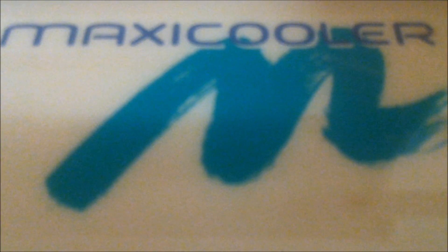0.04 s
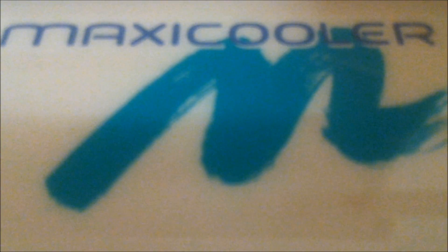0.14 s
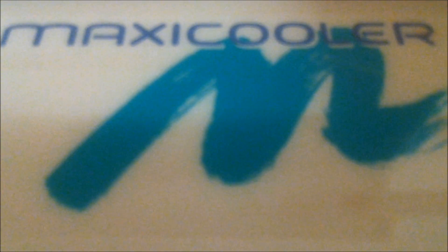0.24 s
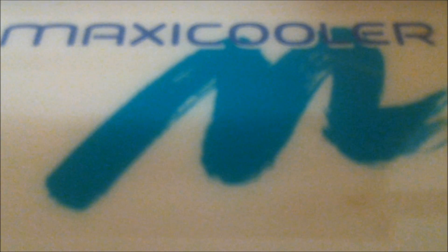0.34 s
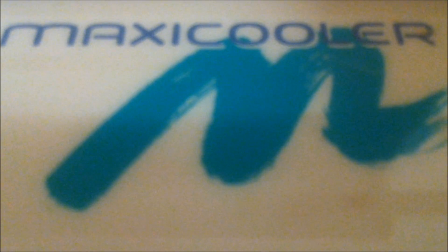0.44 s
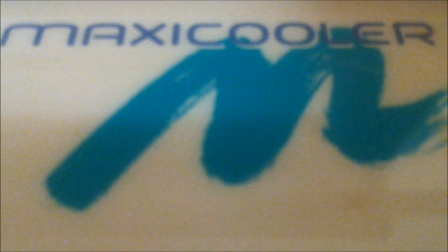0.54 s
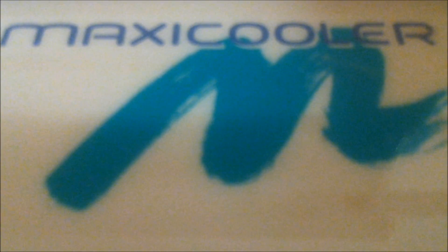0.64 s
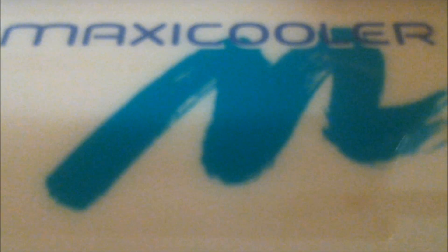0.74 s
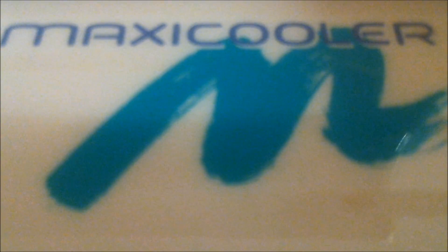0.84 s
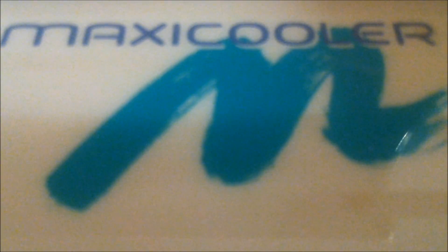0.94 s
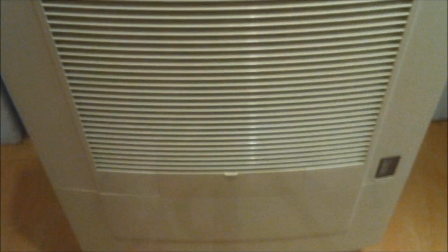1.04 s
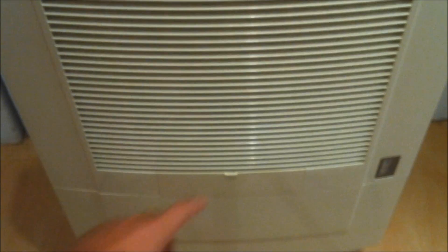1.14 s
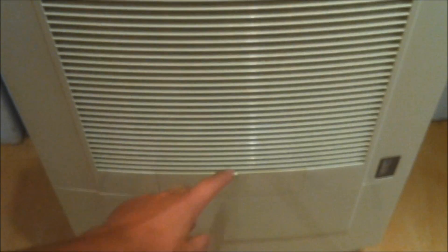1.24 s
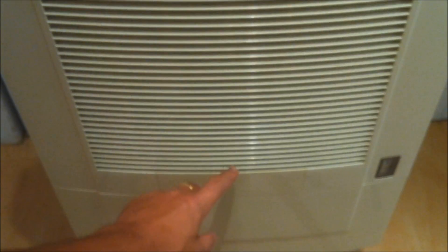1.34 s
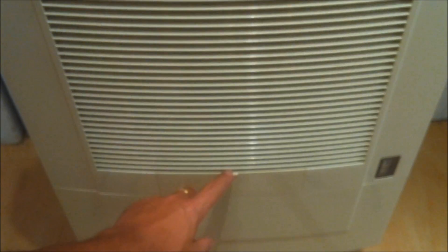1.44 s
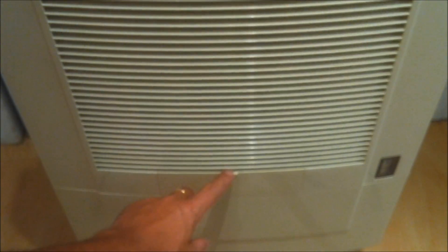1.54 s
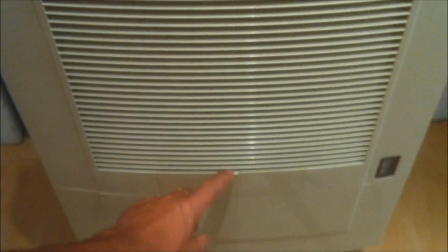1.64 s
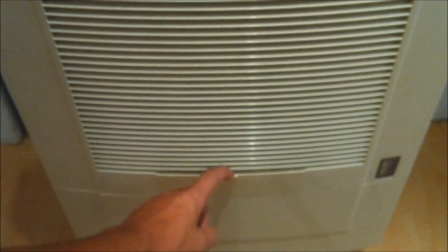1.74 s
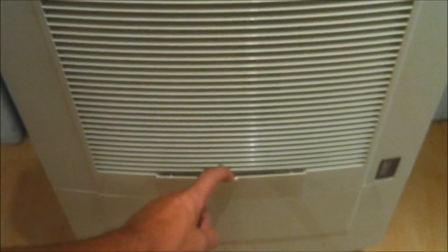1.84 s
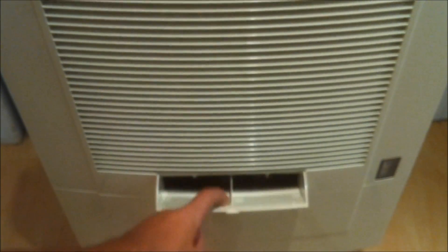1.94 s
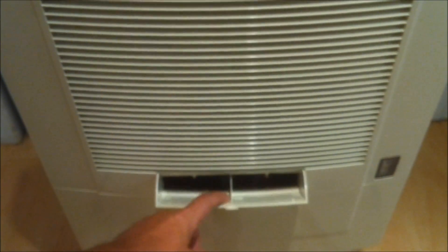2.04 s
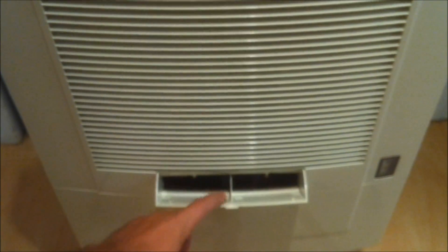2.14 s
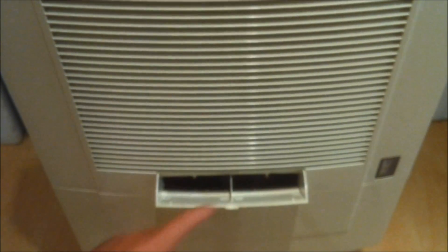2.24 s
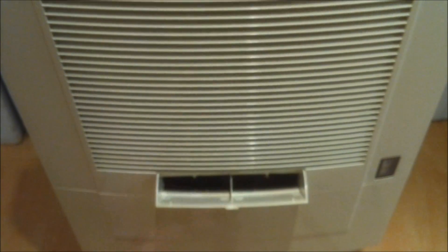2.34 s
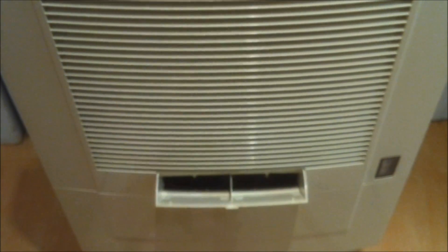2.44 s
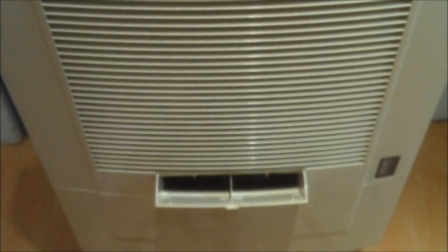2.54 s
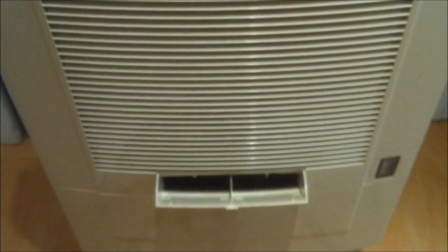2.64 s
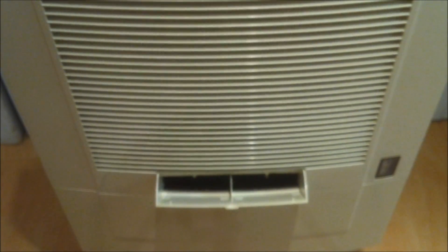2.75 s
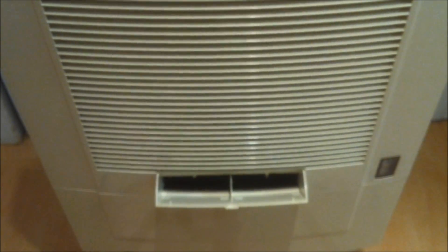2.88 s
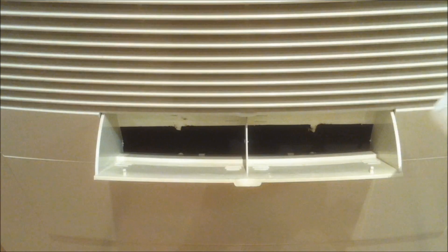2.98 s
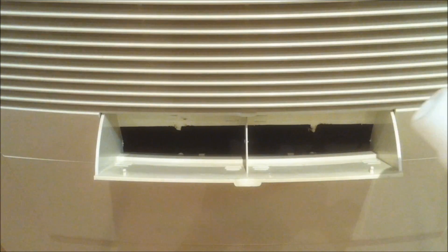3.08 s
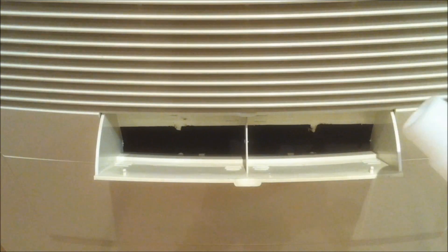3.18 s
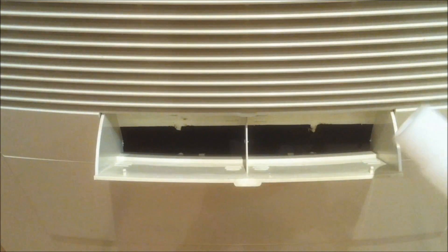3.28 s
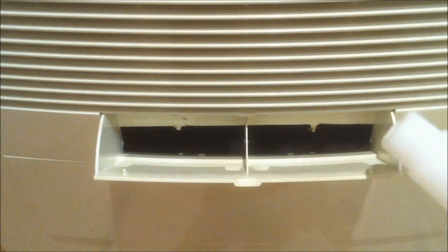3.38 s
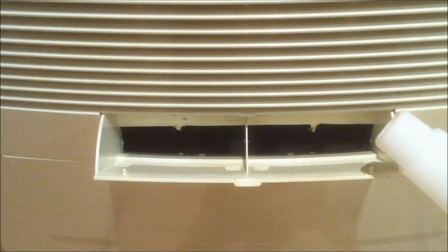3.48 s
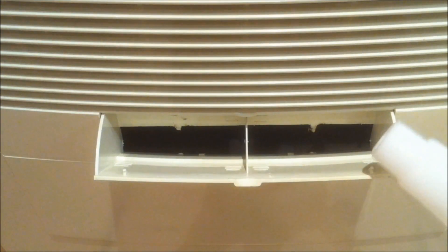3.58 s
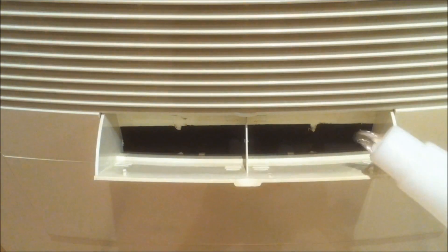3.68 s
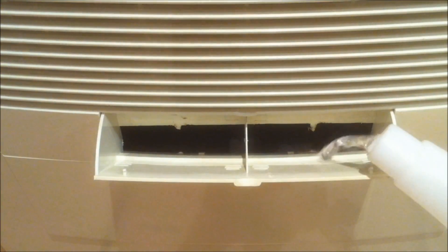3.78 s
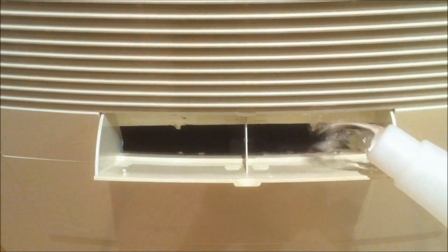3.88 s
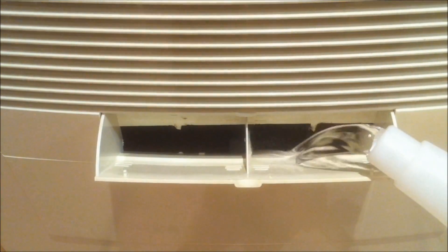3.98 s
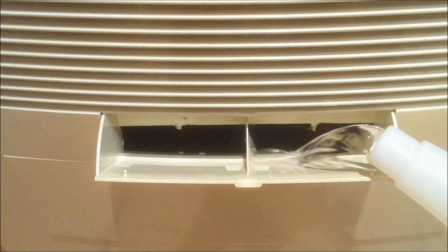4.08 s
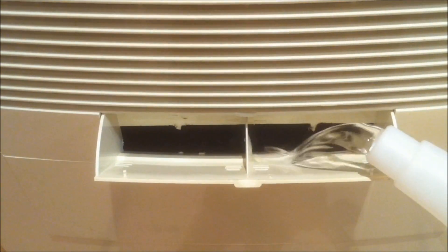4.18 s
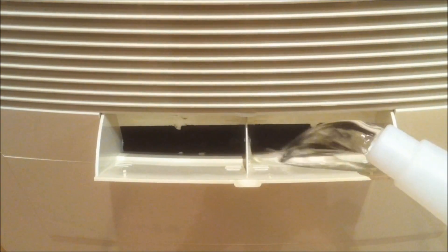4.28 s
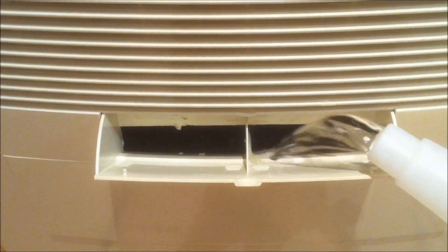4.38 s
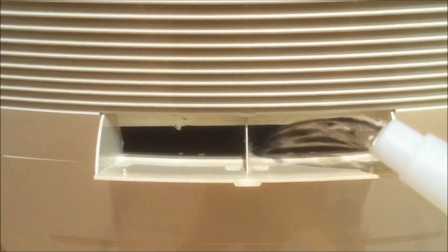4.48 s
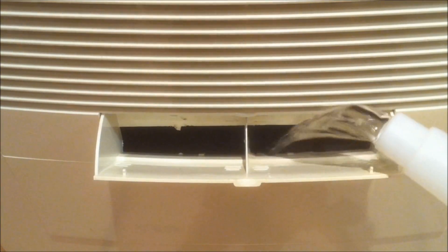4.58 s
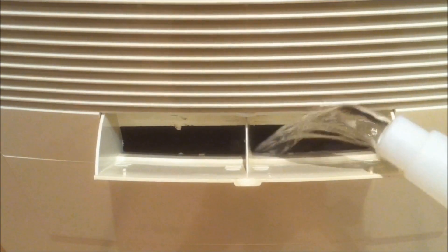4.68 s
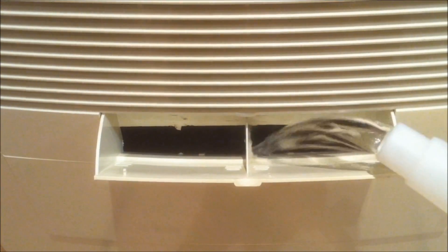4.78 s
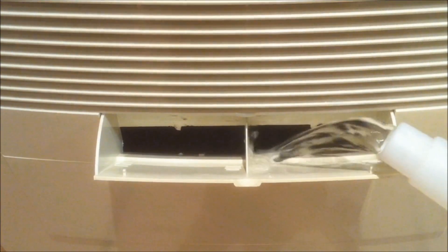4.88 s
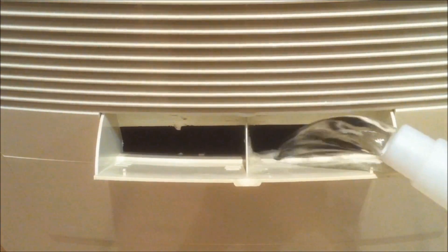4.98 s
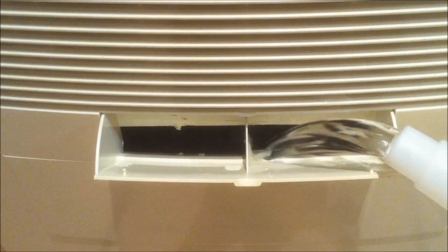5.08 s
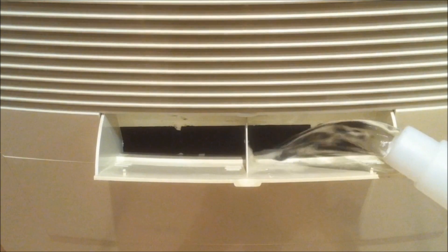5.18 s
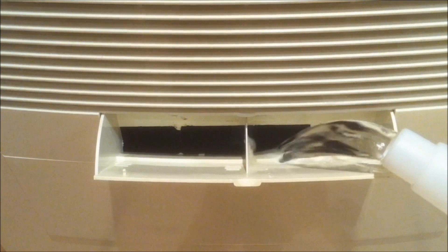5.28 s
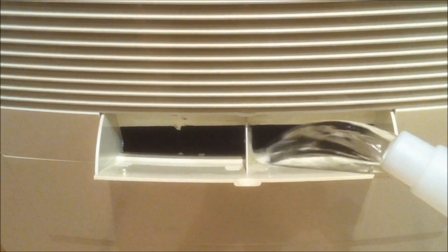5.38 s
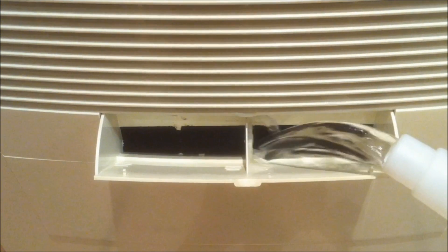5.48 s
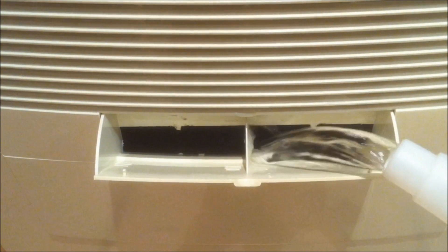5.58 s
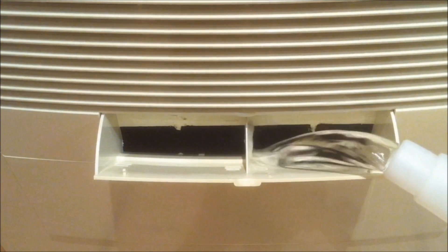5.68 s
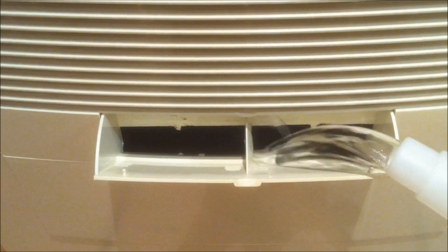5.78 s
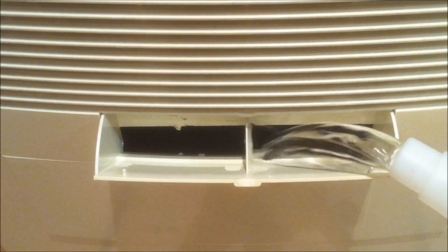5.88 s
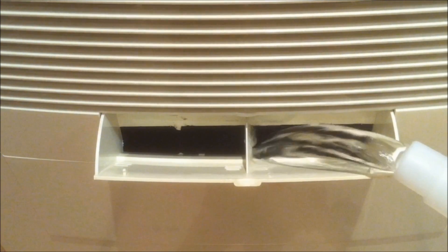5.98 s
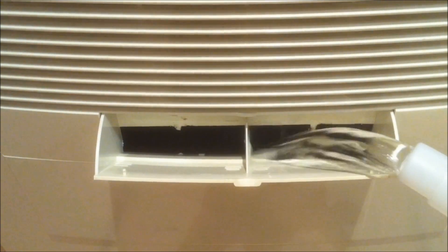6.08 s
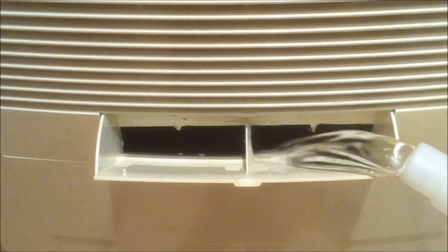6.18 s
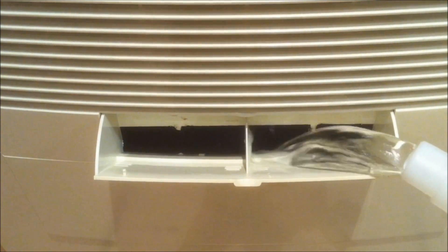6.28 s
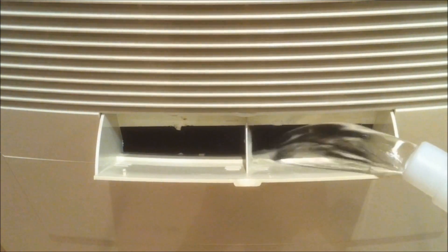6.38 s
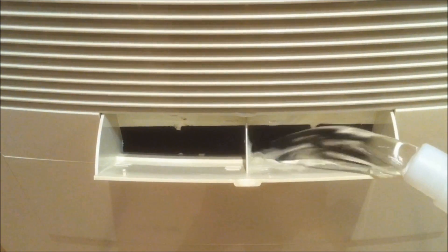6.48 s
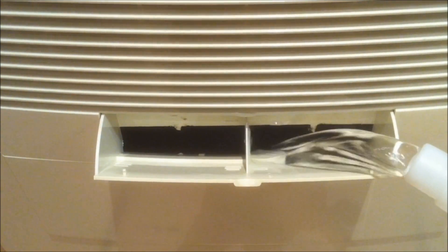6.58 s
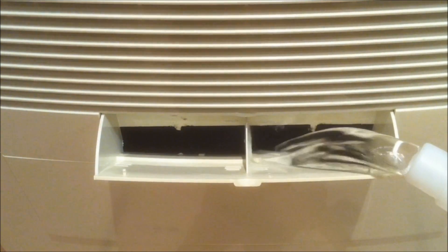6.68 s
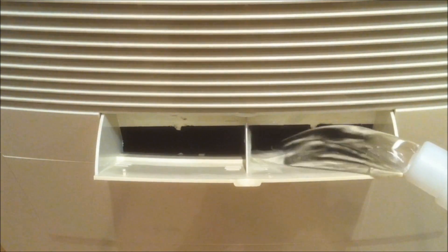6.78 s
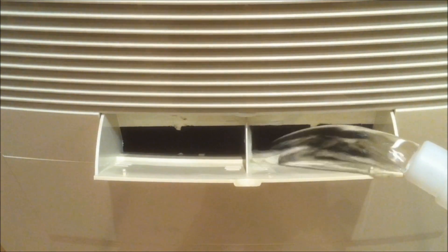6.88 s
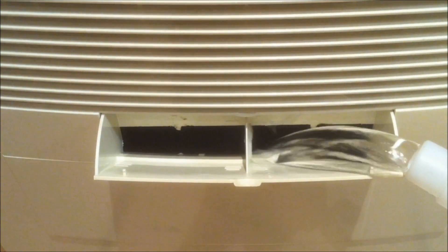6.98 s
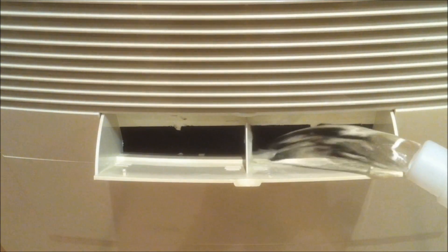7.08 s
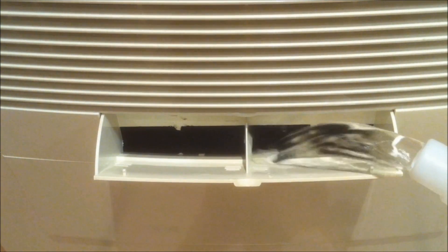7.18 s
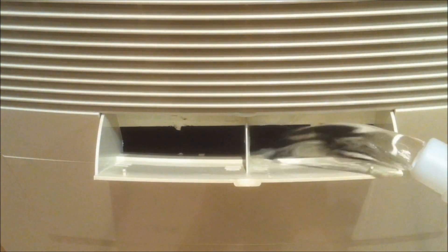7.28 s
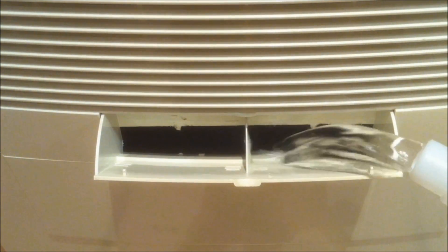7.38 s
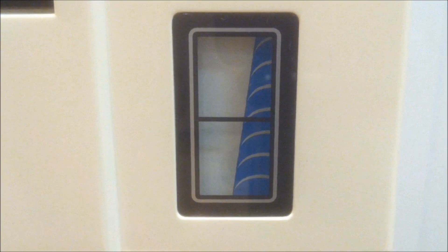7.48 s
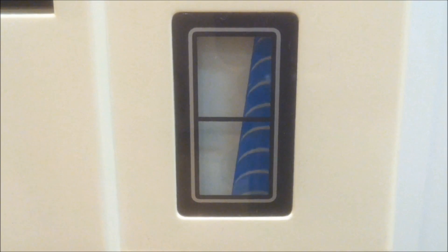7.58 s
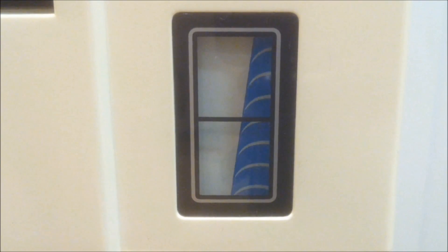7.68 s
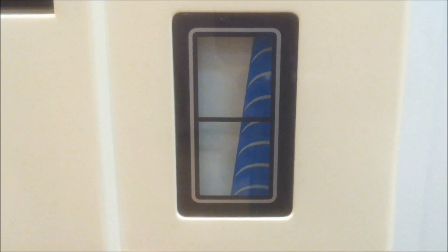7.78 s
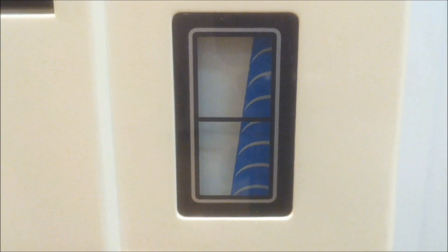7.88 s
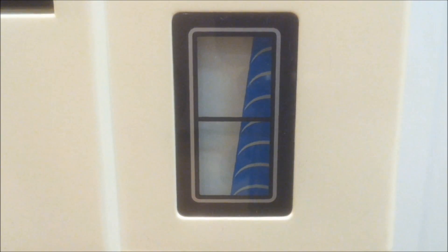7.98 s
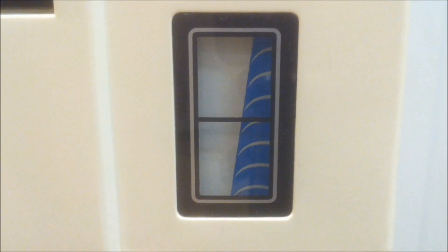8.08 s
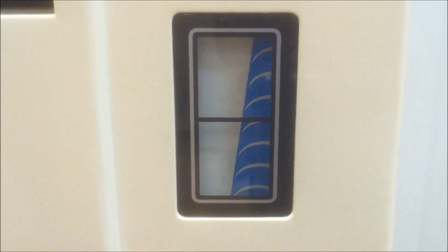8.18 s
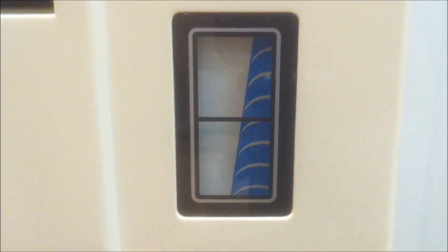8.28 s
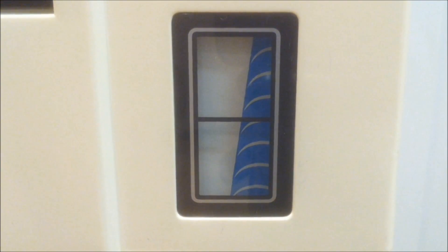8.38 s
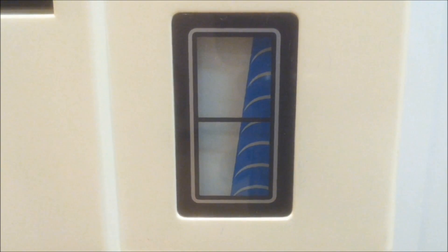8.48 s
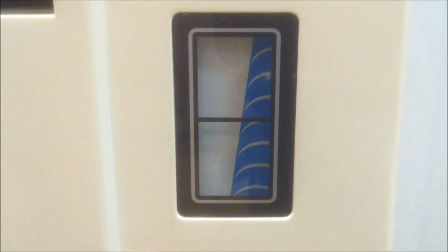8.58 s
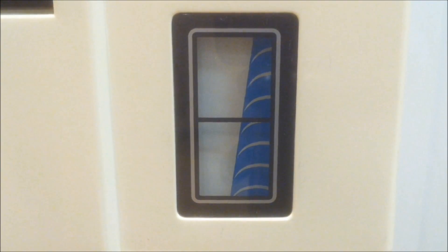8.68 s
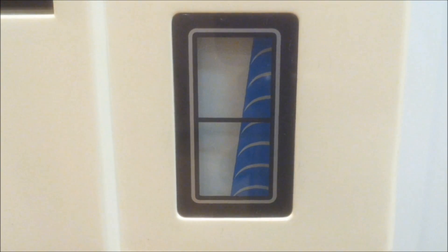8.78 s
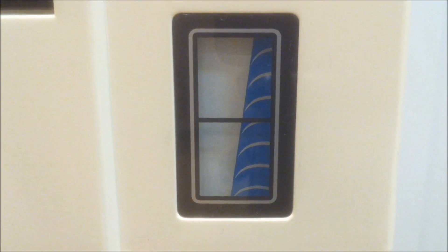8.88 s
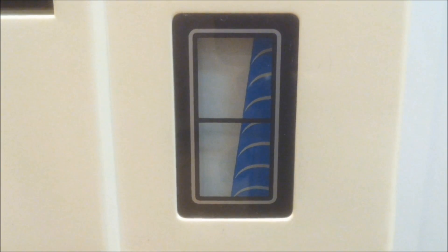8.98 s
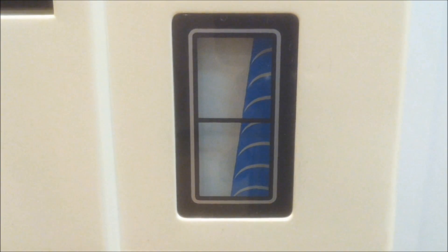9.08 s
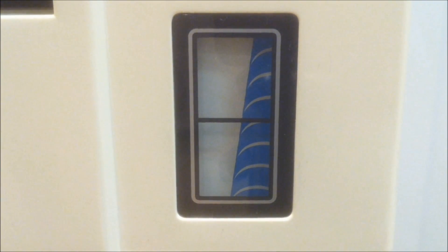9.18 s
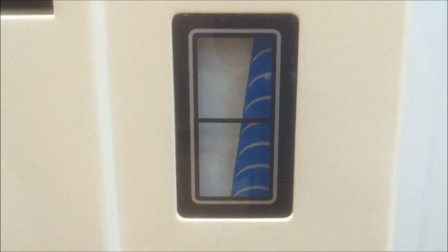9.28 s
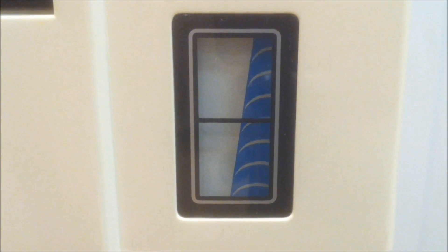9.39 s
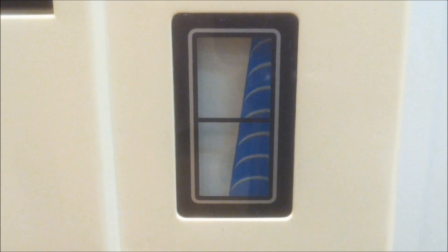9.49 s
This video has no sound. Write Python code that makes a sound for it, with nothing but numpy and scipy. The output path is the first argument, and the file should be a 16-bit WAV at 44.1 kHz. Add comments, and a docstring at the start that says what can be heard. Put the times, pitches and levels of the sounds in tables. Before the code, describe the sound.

A quiet room with faint hum. A hand brushes lightly over plastic, then a flap drags and slams open with a hard rattling knock and a low casing boom. A dull bump of a jug follows, first drops, then a strong splashing, gurgling stream into a hollow tank with thuds. Abruptly the pouring sounds much softer and duller, from the side. One microphone, short room echo.

```python
"""A stream of water splashes through a filler flap into the hollow tank of a portable air cooler:
shaped noise makes the spray, ringing bubbles the gurgle, a humming resonance the tank wall.
Before it, a finger pulls the plastic flap open, it slams on its stop, a jug bumps the lip and drops fall.
Knocks ring as dying tones with bursts of noise. The last part is heard from the side, duller and softer.
A quiet room adds echoes, soft noise and hum. One microphone."""
import sys
import numpy as np
from scipy import signal
from scipy.fft import rfft, irfft, next_fast_len
from scipy.io import wavfile

SR = 44100
rng = np.random.default_rng(int(sys.argv[2]) if len(sys.argv) > 2 else 0)


def log_audio(samples):
    """Write samples as a 16-bit WAV file to the path given in sys.argv[1]."""
    # one column per channel
    frames = np.atleast_2d(samples).T
    # limit to full scale, then quantise
    limited = np.clip(frames, -1, 1)
    pcm = np.round(limited * 32767).astype(np.int16)
    wavfile.write(sys.argv[1], SR, pcm)


N = 420713   # length in samples

# All levels are those before the room and record() act.
# "t60" is the time a sound takes to fall by 60 dB.


def from_db(db):
    """Turn decibels into a plain multiplier."""
    return 10 ** (np.asarray(db) / 20)


def rms_one(x):
    """Scale a sound to an average strength (rms) of 1."""
    return x / np.sqrt(np.mean(x ** 2) + 1e-20)


def gains_in_time(rows):
    """Draw each dB column as one gain per sample, silent outside the table."""
    times, *columns = np.transpose(rows)
    t = np.arange(N) / SR
    return [from_db(np.interp(t, times, column, left=-200, right=-200)) for column in columns]


def at_hz(points, hz):
    """Read a table between its points, with pitch on a logarithmic scale."""
    table_hz, values = np.transpose(points)
    return np.interp(np.log(hz), np.log(table_hz), values)


def colour(x, spectrum):
    """Make some pitches louder than others, following a table; the result has rms 1."""
    size = next_fast_len(N)
    hz = np.arange(size // 2 + 1) * SR / size + 1   # the 1 avoids log(0)
    shaped = rfft(x, size) * from_db(at_hz(spectrum, hz))
    return rms_one(irfft(shaped, size)[:N])


def band(x, low_hz, high_hz):
    """Keep only the pitches between two limits (Butterworth band-pass)."""
    limits = [low_hz, min(high_hz, 0.45 * SR)]
    return signal.sosfilt(signal.butter(2, limits, "band", fs=SR, output="sos"), x)


def ring(clicks, hz, t60):
    """Let each click set off a dying sine, like a tapped object; a click of 1 gives height 1."""
    shrink = from_db(-60 / (t60 * SR))
    turn = 2 * np.pi * hz / SR
    feedback = [1, -2 * shrink * np.cos(turn), shrink * shrink]
    return signal.lfilter([0, np.sin(turn)], feedback, clicks + 1e-18)


def fade(clicks, t60):
    """Make an envelope that jumps at each click and dies away."""
    return signal.lfilter([1], [1, -from_db(-60 / (t60 * SR))], clicks + 1e-18)


def swell(clicks, t60):
    """Fade with a rounded start, as a slap of water takes some milliseconds to spread; rms 1."""
    return rms_one(fade(fade(clicks, t60), 0.24 * t60))


def dying(t, t60):
    """Exponential decay from 1."""
    return from_db(-60 * t / t60)


def chance_clicks(per_s, spread_db):
    """Place clicks at random moments, many small and few large."""
    happens = rng.random(N) < per_s / SR
    return happens * from_db(spread_db * np.minimum(rng.exponential(1, N), 4))


def strike(times, levels_db, modes, damping, soft_hz):
    """Each blow rings every tone of a body with a random strength; a soft contact dulls the sound."""
    at, out = (np.array(times) * SR).astype(int), np.zeros(N)
    for hz, level_db, t60 in modes:
        clicks = np.zeros(N)
        clicks[at] = from_db(levels_db + level_db + rng.normal(0, 2.6, len(at)))
        out += ring(clicks, hz, t60 * damping)
    return signal.sosfilt(signal.butter(2, soft_hz, fs=SR, output="sos"), out)


# loudness of the stream near the flap: (time [s], spray level [dB], bubbling level [dB])
NEAR_LEVELS = [(4.33, -46, -56), (4.38, -46, -60), (4.51, -41.5, -51), (4.67, -39, -48.5), (4.73, -42, -53),
               (4.9, -40, -51.5), (5.05, -46, -52), (5.16, -41.5, -60), (5.28, -44.5, -65),
               (5.38, -38.5, -57), (5.6, -43, -50.5), (5.87, -39.5, -50.5), (6.05, -42, -49),
               (6.29, -38, -45.5), (6.4, -41, -49.5), (6.8, -39.5, -44), (7.01, -40.5, -47),
               (7.4, -39, -43), (7.54, -40, -47)]
# tone of its spray: (frequency [Hz], relative level per Hz [dB])
NEAR_COLOUR = [(180, -39), (300, -11.5), (787, -7.5), (1530, -5), (1720, 0), (2000, -6), (2360, -5.5),
               (4590, -5), (14200, -7), (16000, -9)]
# air spaces of the tank: (frequency [Hz], width setting [Hz], relative level [dB])
NEAR_TANK = [(777, 59, -4.5), (1060, 77, -2.5), (1734, 79, 3.5), (2440, 190, -1)]


def near_stream():
    """The water heard near the flap, with surges that thud on the tank wall."""
    return stream(NEAR_LEVELS, thuds(), NEAR_COLOUR, NEAR_TANK,
                  drum_hz=233.4, width_hz=51, burst_db=-3.0, top_hz=5070, murmur_db=-18.5)


# loudness of the stream from the side: (time [s], spray level [dB], bubbling level [dB])
SIDE_LEVELS = [(7.54, -53, -61), (7.7, -53, -56.5), (8.0, -56, -55), (8.15, -53, -56), (8.35, -56.5, -59.5),
               (8.5, -53, -55), (8.88, -57.5, -58.5), (9.3, -53, -58.5), (9.54, -56.5, -56.5)]
# tone of its spray: (frequency [Hz], relative level per Hz [dB])
SIDE_COLOUR = [(180, -33), (300, -9), (405, -14), (502, -2), (1030, 0), (2250, -7.5), (2980, -4.5),
               (7820, -12.5), (13300, -16.5), (16000, -12.5)]
# air spaces of the tank: (frequency [Hz], width setting [Hz], relative level [dB])
SIDE_TANK = [(1085, 125, 4.5), (1295, 110, 2.5), (1680, 110, -6), (1950, 240, 7.5), (2900, 210, 1)]


def side_stream():
    """The same filling heard from the side of the casing, without separate thuds."""
    return stream(SIDE_LEVELS, 0, SIDE_COLOUR, SIDE_TANK,
                  drum_hz=359, width_hz=82, burst_db=-1.5, top_hz=6500, murmur_db=-6.5)


BUNCHES_PER_S, BUNCH_T60_S, BUNCH_SHARE = 25, 0.12, 0.26   # bubbles come in bunches


def stream(levels, surges, spectrum, tank, drum_hz, width_hz, burst_db, top_hz, murmur_db):
    """Spray, bubbles in bunches and the low drumming of the plastic wall under the falling water."""
    spray, bubbles = gains_in_time(levels)
    wall = rms_one(ring(rng.standard_normal(N), drum_hz, 2.54 / width_hz))   # a wider tone dies sooner
    bunch_swells = swell(chance_clicks(BUNCHES_PER_S, spread_db=3.5), BUNCH_T60_S)
    bunches = rms_one(0.5 + BUNCH_SHARE * bunch_swells)
    drumming = surges + from_db(murmur_db) * spray   # thuds over a murmur that follows the spray
    sprayed = spray * splash(spectrum, burst_db)
    gurgled = bubbles * bunches * gurgle(tank, 350, top_hz)
    return sprayed + gurgled + drumming * wall


def splash(spectrum, burst_db):
    """Slaps of water swell half-octave bands of noise, partly all together, partly in pairs."""
    white, out = rng.standard_normal((2, N)), 0
    together = swell(chance_clicks(28.0, spread_db=6.5), 0.085)
    edges = 300 * 2 ** np.arange(0, 6.1, 0.5)   # Hz
    for k, (low, high) in enumerate(zip(edges, edges[1:])):
        if k % 2 == 0:   # each pair of bands shares its own swells
            alone = swell(chance_clicks(45, spread_db=2.0), 0.065)
        bursts = 1 + from_db(burst_db) * (0.52 * together + alone)
        gain = from_db(at_hz(spectrum, np.sqrt(low * high))) * bursts
        out = out + gain * band(white[k % 2], low, high)
    return rms_one(out)


def gurgle(tank, per_s, top_hz):
    """Small bubbles, shaken by puffs of noise, ring at many pitches; the tank's air favours some."""
    clicks = chance_clicks(per_s, spread_db=3.0)
    puffs = fade(clicks, 0.018) * rng.standard_normal(N)
    pitch_number = rng.integers(0, 13, N)[np.cumsum(clicks > 0)]   # kept until the next bubble
    rings, hollow = 0, 0
    for k, hz in enumerate(np.geomspace(550, top_hz, 13)):
        rings = rings + rms_one(ring(puffs * (pitch_number == k), hz, 13.2 / hz))
    for hz, width, db in tank:
        favoured = band(rings, hz - 1.0 * width, hz + 0.6 * width)
        hollow = hollow + from_db(db) * favoured / np.sqrt(width / hz)
    return rms_one(rms_one(rings) + 0.77 * rms_one(hollow))


# surges of the stream thud on the tank wall: (time [s], level [dB], held time [s])
THUDS = [(4.51, -47.5, 0.14), (4.85, -59, 0.041), (5.13, -59, 0.058), (5.45, -53.5, 0.051),
         (5.6, -57, 0.089), (5.75, -53, 0.031), (5.86, -52, 0.037), (6.08, -59, .03), (6.25, -49.5, 0.059),
         (6.53, -53.5, 0.049), (6.76, -55.5, .14), (7.24, -58.5, 0.065), (7.44, -63, .08)]
THUD_ATTACK_S, THUD_RELEASE_S = 0.018, 0.037


def thuds():
    """Loudness of the surges: each rises, holds and dies away in straight lines."""
    t, out = np.arange(N) / SR, np.zeros(N)
    for s, db, held in THUDS:
        corners = [s - THUD_ATTACK_S, s, s + held, s + held + THUD_RELEASE_S]
        out += from_db(db) * np.interp(t, corners, [0, 1, 1, 0])
    return out


# the clearest bubbles and slaps of water: (time [s], level [dB], starting pitch [Hz])
DROPS = [(3.995, -35, 4620), (3.995, -34.5, 2420), (4, -36, 1317), (4.165, -42.5, 3490),
         (4.167, -42.5, 4960), (4.269, -46, 5880), (4.29, -39.5, 510), (4.337, -33.5, 1590),
         (4.38, -29.5, 3006), (4.462, -35, 2950), (4.555, -34.5, 3450), (4.773, -25.5, 1730),
         (4.862, -37, 2880), (4.987, -35.5, 2500), (5.084, -33, 1730), (5.09, -34, 2440),
         (5.151, -33.5, 4930), (5.17, -34, 3150), (5.493, -35, 2270), (5.522, -35.5, 2270),
         (5.562, -33, 1450), (5.73, -37.5, 1740), (5.858, -31.5, 662), (5.858, -26.5, 3500),
         (5.86, -27.5, 2720), (6.011, -30.5, 3800), (6.063, -32, 2550), (6.088, -32, 1440),
         (6.11, -36.5, 860), (6.145, -32, 1347), (6.147, -36, 730), (6.152, -35, 1040), (6.266, -34, 1910),
         (6.295, -23, 2246), (6.315, -34, 4070), (6.423, -28, 5070), (6.425, -28, 2450),
         (6.636, -29.5, 2090), (6.709, -31.5, 1740), (6.711, -32.5, 794), (6.765, -25, 1118),
         (7.032, -31, 4110), (7.073, -29, 1753), (7.205, -42, 810), (7.241, -39, 1096), (7.294, -35, 750),
         (7.395, -34.5, 1750), (7.437, -24.5, 803), (7.474, -35, 2800), (7.628, -45, 630),
         (7.654, -46, 687), (7.845, -43, 1850), (7.852, -38.5, 1060), (7.853, -39, 3270), (7.859, -45, 617),
         (7.86, -42, 1326), (7.975, -43.5, 2080), (8.101, -43, 1036), (8.157, -45, 920), (8.464, -44, 1880),
         (8.496, -39.5, 619), (8.949, -46, 3960), (8.954, -50, 1060), (9.057, -42.5, 845),
         (9.07, -39, 1870), (9.144, -46, 2980), (9.286, -47, 790), (9.337, -42, 1050), (9.431, -44, 3180),
         (9.44, -43, 1950), (9.443, -42, 1030)]
DROP_T60_S, DROP_T60_SLOPE = 0.093, -0.22   # t60 at 1 kHz and its power law in pitch
DROP_NOISINESS, NOISIER_PER_OCTAVE = 0.34, 0.11   # share of slap noise at 1 kHz; more for higher drops


def drops():
    """A bubble rises in pitch as it dies, blurred by slap noise around it; small bubbles die sooner."""
    out, t = np.zeros(N + 8000), np.arange(8000) / SR
    for (s, level_db, hz), noise in zip(DROPS, rng.standard_normal((len(DROPS), 8000))):
        at = int(s * SR)
        t60 = DROP_T60_S * (hz / 1000) ** DROP_T60_SLOPE
        noisy = np.clip(DROP_NOISINESS + NOISIER_PER_OCTAVE * np.log2(hz / 1000), 0, 1)
        bubble = np.sin(2 * np.pi * hz * (t + 1.54 * t ** 2))   # the square term lifts the pitch
        slap = rms_one(band(noise, hz / 1.27, hz * 1.23))
        envelope = np.minimum(t / 0.00083, 1) * from_db(level_db) * dying(t, t60)
        out[at:at + 8000] += envelope * ((1 - noisy) * bubble + noisy * slap)
    return out[:N]


# the clearest spits of spray: (time [s], level [dB], middle of the noise band [Hz])
SPITS = [(3.994, -50, 6500), (3.994, -44, 13000), (4.165, -48.5, 8550), (4.257, -48, 8300),
         (4.404, -38, 10300), (4.443, -36, 13000), (4.772, -34, 10200), (4.921, -38, 10320),
         (5.106, -37.5, 6500), (5.14, -32.5, 11580), (5.16, -30.5, 13000), (5.387, -33.5, 11500),
         (5.41, -30, 10100), (5.462, -32, 11580), (5.493, -30.5, 13000), (5.885, -35, 6500),
         (5.749, -37, 7300), (5.792, -36, 10500), (5.967, -37, 7000), (6.177, -33, 9300),
         (6.275, -36, 9190), (6.317, -31, 6500), (6.423, -29.5, 10200), (6.461, -34.5, 13000),
         (6.5, -33.5, 11500), (6.814, -37, 11580), (7.147, -32.5, 10500), (7.292, -36, 13000),
         (7.619, -49, 11580), (7.768, -48, 13000), (7.849, -44.5, 13000), (7.971, -43, 13000),
         (8.281, -52, 12760), (8.346, -47, 13000), (8.403, -45.5, 10000), (8.551, -49, 11580),
         (8.585, -38.5, 11580), (8.702, -50, 12900), (9.207, -50, 9190), (9.287, -46.5, 13000),
         (9.338, -49, 13000), (9.452, -43.5, 10320), (9.514, -38, 13200)]
SPIT_T60_S, TICK_DB, TICK_T60_S = 0.045, 2, 0.0066   # the hiss; the tick at its start, relative to it


def spits():
    """Flying spray gives quick bursts of bright noise: a short tick and a longer hiss."""
    out, t = np.zeros(N + 4000), np.arange(4000) / SR
    for (s, level_db, hz), noise in zip(SPITS, rng.standard_normal((len(SPITS), 4000))):
        at = int(s * SR)
        decay = dying(t, SPIT_T60_S) + from_db(TICK_DB) * dying(t, TICK_T60_S)
        envelope = np.minimum(t / 0.0012, 1) * from_db(level_db) * decay
        out[at:at + 4000] += envelope * rms_one(band(noise, 0.66 * hz, 1.38 * hz))
    return out[:N]


# the flap drags on its hinge: (time [s], level [dB])
DRAG = [(1.84, -75), (1.954, -50.5), (2.028, -73), (2.076, -43.5), (2.088, -45)]
# a faint click, then light knocks and the flap hitting its stop:
# (time [s], ring level [dB], rattle level [dB], crack level [dB])
SLAM = [(1.17, -65, -77, -80), (1.888, -52, -57, -64), (1.91, -54, -48, -69), (2.049, -52, -60, -70),
        (2.091, -49, -17, -44), (2.096, -28.5, -15.5, -37), (2.106, -22.5, -25, -34.5),
        (2.113, -41, -25, -32), (2.119, -17, -36, -39), (2.136, -19, -20, -29), (2.138, -19, -15, -36)]
# tones of the casing: (frequency [Hz], relative level [dB], t60 before damping [s])
CASING = [(177, -38, 0.178), (210.3, 5.5, 0.27), (329, -8, 0.35), (353, -15.5, 0.33), (450, -5, 0.11),
          (511, -10.5, 0.305), (626, -21, .2), (808, -2, 0.17)]
# tone of the rattle and drag: (frequency [Hz], relative level per Hz [dB])
RATTLE_COLOUR = [(110, -48), (160, -14.5), (250, -1.5), (400, -1), (850, -7), (1300, -13), (2400, -19),
                 (4000, -29.5), (6000, -35.5)]


def flap():
    """The hinge drags and creaks, then the flap rattles against its stop and the casing booms."""
    rattle_noise = colour(rng.standard_normal(N), RATTLE_COLOUR)
    slips = fade(chance_clicks(220, spread_db=4.5), 0.0365)
    drag = gains_in_time(DRAG)[0] * rms_one(rattle_noise * (1 + slips))
    s, ring_db, rattle_db, crack_db = np.transpose(SLAM)
    at = (s * SR).astype(int)
    shakes, cracks = np.zeros((2, N))
    shakes[at], cracks[at] = from_db(rattle_db), from_db(crack_db)
    boom = strike(s, ring_db, CASING, damping=0.92, soft_hz=1500)
    rattle = fade(shakes, 0.083) * rattle_noise
    crack = fade(cracks, 0.044) * rms_one(band(rng.standard_normal(N), 2270, 10800))
    return drag + boom + rattle + crack


# the jug meets the lip of the flap: (time [s], level [dB])
BUMP = [(3.82, -34), (3.826, -25.5), (3.839, -30.5), (3.875, -37)]
# tones of the lip: (frequency [Hz], relative level [dB], t60 before damping [s])
LIP = [(229, 0, 0.12), (414, 3, 0.12), (588, -10, 0.57), (757, -8, 0.17), (860, -16, 0.19),
       (1030, -33, 0.33), (1093, -26, 0.069), (1225, -22, 0.19)]


def jug():
    """A dull bump of plastic on plastic: soft blows on strongly damped tones."""
    s, level_db = np.transpose(BUMP)
    return strike(s, level_db, LIP, damping=0.23, soft_hz=1570)


# how long echoes last: (frequency [Hz], t60 [s])
ROOM_T60 = [(100, 0.45), (250, 0.47), (1000, 0.72), (4000, 0.58), (14000, 0.16)]


def room(x):
    """Echoes blend into a diffuse tail: octave bands of noise, each dying at its own rate."""
    t, edges = np.arange(SR) / SR, 62 * 2 ** np.arange(9)
    tail = np.zeros(SR)
    for low, high in zip(edges, edges[1:]):
        tail += band(rng.standard_normal(SR), low, high) * dying(t, at_hz(ROOM_T60, 0.72 * low))
    tail *= np.minimum(t / 0.0059, 1)   # the first echoes take time to build
    return signal.fftconvolve(x, tail / np.sqrt(np.sum(tail ** 2)))[:N]


# loudness of the room air: (time [s], level [dB])
AIR_LEVELS = [(0, -59), (1.1, -59), (1.2, -58), (3.02, -58.5), (3.05, -60), (7.5, -55.5), (7.54, -56),
              (9.54, -57.5)]
# its tone: (frequency [Hz], relative level per Hz [dB])
AIR_COLOUR = [(65, -57), (110, -25), (140, -4.5), (175, -10), (210, -5), (350, -8), (410, -8), (470, -11.5),
              (560, -14), (1460, -24.5), (4000, -27.5), (11000, -30.5), (15000, -29), (16000, -25)]
# faint hum tones: (frequency [Hz], rms level [dB])
HUM = [(145.3, -68), (209.9, -74.5), (344.5, -73), (409.1, -68.5), (538.3, -73), (2998, -86.5)]
# a hand brushes the grille: (time [s], level [dB])
BRUSH = [(1.16, -78), (1.318, -62), (1.438, -62), (1.536, -70), (1.7, -78)]


def air():
    """Soft room noise of slightly varying level, steady hum tones and the hiss of a brushing hand."""
    level, = gains_in_time(AIR_LEVELS)
    t, hum = np.arange(N) / SR, np.zeros(N)
    for hz, db in HUM:   # the root of 2 turns an rms level into a sine's height
        hum += np.sqrt(2) * from_db(db) * np.sin(2 * np.pi * (hz * t + rng.random()))
    brush = gains_in_time(BRUSH)[0] * rms_one(band(rng.standard_normal(N), 1500, 19400))
    return level * colour(rng.standard_normal(N), AIR_COLOUR) + hum + brush


SIDE_S = 7.537   # from this moment on, one listens from the side


def scene():
    """Water and knocks in the room; the change of listening place is sudden."""
    near = np.arange(N) < SIDE_S * SR
    single = drops() + spits()
    water = single + near_stream()
    knocks = flap() + jug()
    front = water + knocks + room(from_db(-4) * knocks + from_db(-7.5) * water)
    side = (single + side_stream()) * ~near
    mono = front * near + side + from_db(-6.5) * room(side) + air()
    return np.array([mono, mono])


CUTOFF_HZ = 16250   # nothing much passes above this


def record(dry):
    """A steep bass cut, rounded peaks, a faint rumble of the electronics, and the top cut."""
    thin = signal.sosfilt(signal.butter(7, 142, "high", fs=SR, output="sos"), dry)
    deep = 0.9 * band(rng.standard_normal(N), 16, 34.4)
    rumble = from_db(-81.5) * rms_one(deep + band(rng.standard_normal(N), 80, 128))
    rounded = 0.68 * np.tanh(thin / 0.73)
    top_cut = signal.cheby2(16, 70, CUTOFF_HZ, fs=SR, output="sos")
    return signal.sosfilt(top_cut, rounded + rumble)


dry = scene()
out = record(dry)
log_audio(out)
```